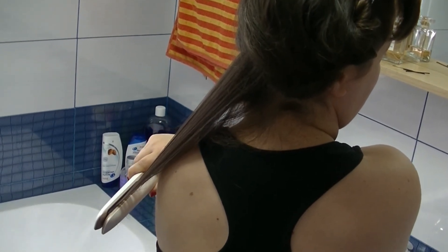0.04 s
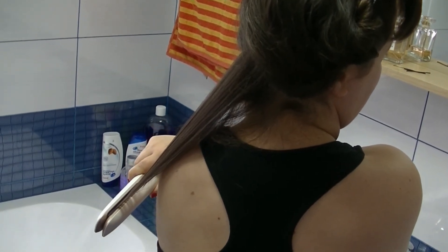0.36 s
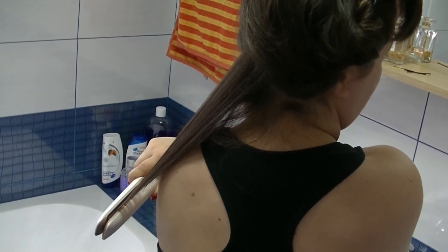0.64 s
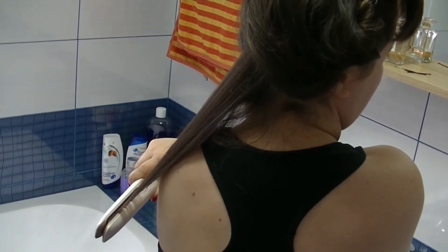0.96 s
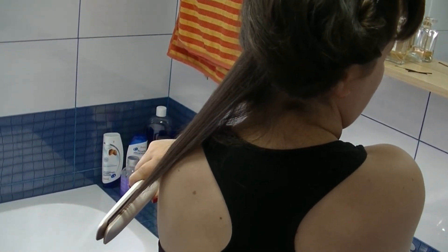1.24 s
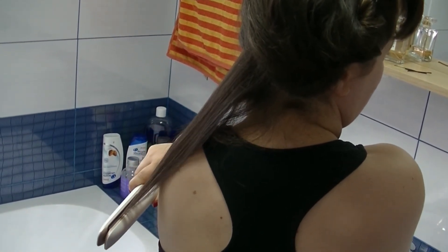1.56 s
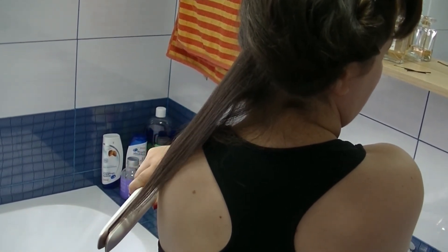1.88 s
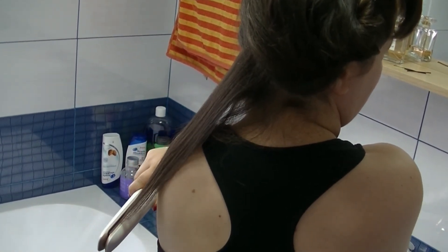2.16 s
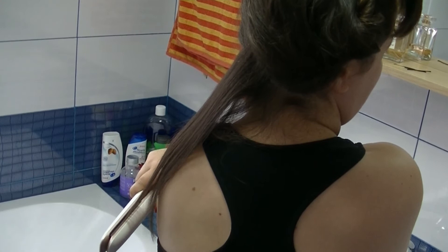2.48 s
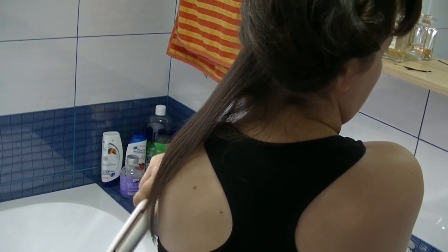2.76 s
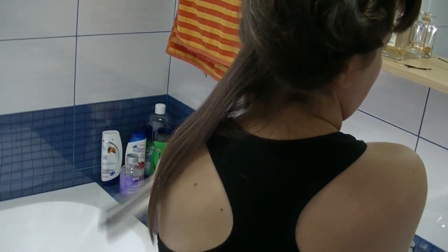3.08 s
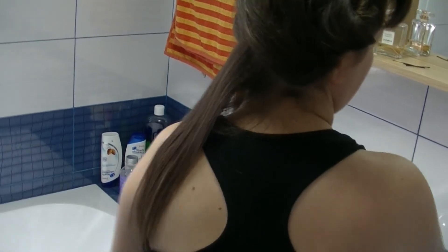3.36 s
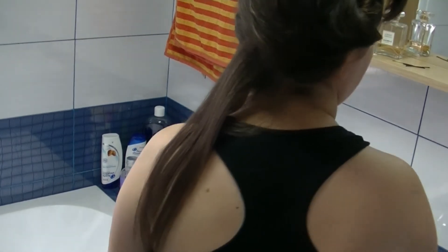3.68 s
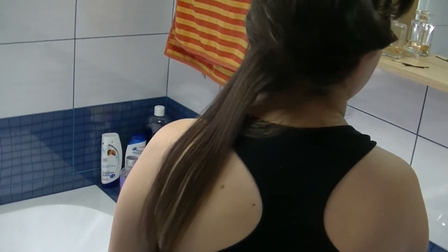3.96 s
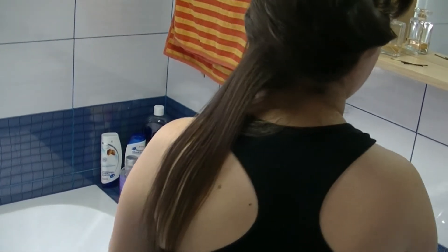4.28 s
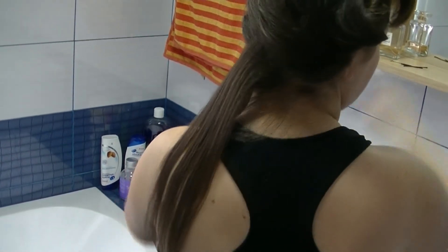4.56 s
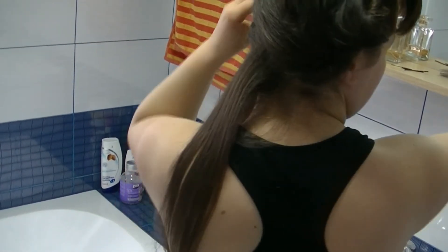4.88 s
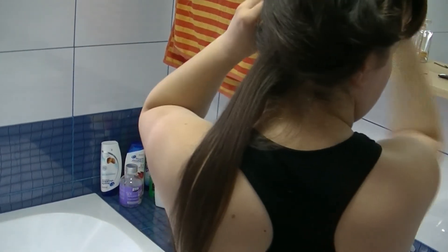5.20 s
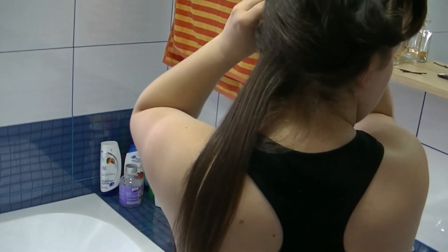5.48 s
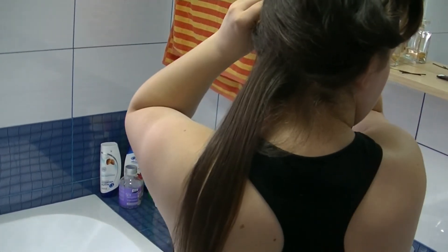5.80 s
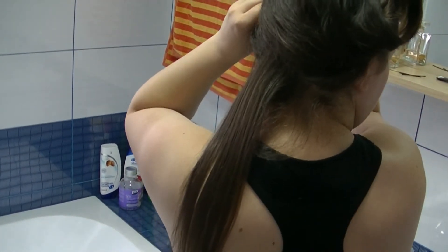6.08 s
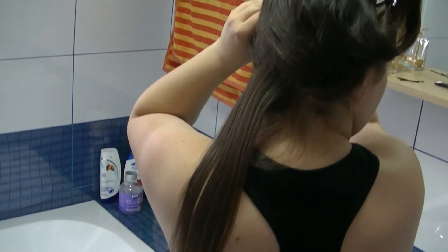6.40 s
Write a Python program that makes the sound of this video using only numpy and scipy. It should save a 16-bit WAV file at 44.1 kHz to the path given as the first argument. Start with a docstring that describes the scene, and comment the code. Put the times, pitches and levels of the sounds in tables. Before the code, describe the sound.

Faint hair strokes and clicks in a small tiled bathroom, followed by a straightener's booming knocks on the tub and a sharp plastic clack.

```python
"""A small tiled bathroom. Hair hisses in soft strokes through a straightener, whose plastic squeaks and
whose jaws click. From 3.4 s it is laid on the edge of the bath: the case cracks, the plates ring, the
hollow tub booms. Near 4.9 s a hard plastic thing, probably a comb, clacks down on the shelf; a few more
strokes and one faint click follow. The tiles ring after each knock, click and clack, and a hand-held
camera adds soft bumps, one dry tick and a bed of hiss."""
import sys
import numpy as np
from scipy import signal
from scipy.fft import rfft, irfft, next_fast_len
from scipy.io import wavfile
from scipy.ndimage import uniform_filter1d

SR = 44100
rng = np.random.default_rng(int(sys.argv[2]) if len(sys.argv) > 2 else 0)


def wav_out(sig):
    """Save sig, one row per channel (or a flat mono array), as 16-bit PCM at SR to the path in sys.argv[1]."""
    wavfile.write(sys.argv[1], SR, np.round(np.clip(np.atleast_2d(sig).T, -1, 1) * 32767).astype(np.int16))


N = 284004
AGE = np.arange(SR) / SR  # seconds since a blow

# The straightener hits the bath. Each row: start in seconds, case gain in dB, contact decay in seconds,
# treble gain in dB, mid gain in dB, weight on the tub in dB.
KNOCKS = [ (3.4174, -3, 0.013, 1, 13, -12.5), (3.5010, 4.5, 0.0012, 11, 12, -7.5),
          (3.6500, 12, 0.011, 10, 2.5, -2.5), (3.6567, 17, 0.02, -12, 8, -1),
          (3.8666, 12, .0013, -3, 1.5, 10), (3.9110, -5.5, 0.0019, 0, 19.5, 9),
          (3.9660, 2, 0.0037, -9, -4, -14), (4.008, 7, 0.0015, 2, -4.5, -12),
          (4.185, -4, 0.032, 12.5, 2, -13), (4.2240, -2.5, .0078, 7, 11, -1),
          (4.2279, 14.5, .0045, 5, -0.5, 0), (4.245, 9, 0.011, 7.5, 2, 14.5)]
# The arms drop as the hand lets go, and bounce once. Each row: start in seconds, gain in dB.
ARM_DROPS = [(4.228, -21.5), (4.245, -25)]
# The comb touches the shelf, then rattles.
# Each row: start in seconds, gain in dB, contact decay in seconds, mid gain in dB.
CLACKS = [(4.834, -4.5, 0.0043, 11), (4.8947, 17, 0.0023, -8), (4.9057, 20, 0.0011, -0.5),
          (4.9107, 18, .0013, -0.5), (4.9172, 8, 0.0059, -1)]
# Jaws and hinge click. Each row: start in seconds, gain in dB.
CLICKS = [(1.619, -27.5), (2.321, -16.5), (2.378, -25.5), (2.6878, -3), (6.119, -35)]
# Plastic rubs. Each row: start in seconds, relative level in dB, pitch in Hz, length in seconds.
SQUEAKS = [(0.655, -60, 2050, .012), (2.083, -61, 1940, 0.025), (2.192, -52.5, 5250, 0.027),
           (2.228, -64, 3450, .04), (3.27, -57, 2080, 0.012), (4.12, -42.5, 3150, 0.028)]
# Hair runs through plates and fingers.
# Each row: fastest moment in seconds, level in dB, rough length in seconds.
STROKES = [(0.35, -67, 0.62), (1.69, -64, 0.13), (2.007, -65, 0.075), (2.334, -62, 0.16), (3.06, -56, 0.24),
           (3.35, -61, 0.22), (5.428, -63.5, 0.091), (5.773, -62.5, 0.12), (6.15, -63.5, 0.28)]
# Fingers bump the camera. Each row: start in seconds, gain in dB.
BUMPS = [(0.369, -52.5), (0.77, -49.5), (2.4, -52), (3.040, -52.5), (3.323, -50), (4.981, -39),
         (5.237, -38), (6.14, -55)]

# The tone colour of each source. Each row: frequency in Hz, gain in dB.
CASE_EQ = [(60, -76), (150, -17), (280, -9), (450, -9), (650, -16), (1100, -11.5), (1600, -5), (2300, 0.5),
           (3100, -5.5), (4200, -14), (6500, -18), (8700, -23), (10200, -33.5), (16000, -38)]
PLATE_EQ = [(550, -40), (1000, -1)]  # narrow plates give off little bass
COMB_EQ = [(60, -36), (300, -24.5), (600, -20.5), (1100, -17.5), (1800, -12.5), (2400, -6.5), (3200, -9.5),
           (4500, -3), (6500, -7), (8500, -11.5), (10500, -18), (16000, -24)]
JAW_EQ = [(100, -70), (750, -22.5), (1150, -5), (1500, 0.5), (2300, -2), (3100, 0), (4400, -11.5),
          (6500, -14.5), (8500, -10.5), (11000, -19), (16000, -14)]
HAIR_EQ = [(100, -32), (900, -17.5), (1800, 0.5), (3000, -1), (5000, -2.5), (8000, -6), (16000, -27)]
SNAG_EQ = [(900, -10), (1600, -22), (2050, -8), (2450, 7), (2900, 2), (4000, -29), (12000, -20)]  # one hair ticking on the plates
CAMERA_SHELL_EQ = [(100, -38), (1400, -27), (2050, 5), (2300, -9), (2700, 7), (3500, 1), (4400, -20),
                   (16000, -47)]
HISS_EQ = [(15, -49), (25, -12.5), (156, -4), (193, -2.5), (221, -3.5), (274, 1), (523, -7.5), (666, -16.5),
           (871, -14), (1340, -16), (1570, -12.5), (2010, -9.5), (3260, -11.5), (7910, -14.5),
           (15500, -23.5)]

# How the struck parts ring. Each row: pitch in Hz, relative level in dB, seconds to fall by 60 dB.
CASE_MODES = [(500, -65, 0.59), (718, -59.5, 0.28), (825, -64, 0.55), (940, -63, 0.6), (1465, -53, 0.41),
              (1870, -65, 0.21), (1920, -55, 0.18), (2234, -52, 0.29)]  # the straightener's hollow plastic
PLATE_MODES = [(1155, -2.5, 0.11), (1197, -3.5, 0.13), (1298, -6, 0.15), (1640, -17.5, 0.22),
               (2410, -15, .23), (2444, -16, 0.45), (2573, -27, 0.53)]  # its arms and plates
BOOM_MODES = [(214, -9, 0.35), (227.2, -6, 0.63), (249.3, -5.5, 0.65), (290.2, -6.5, 0.72),
              (305.8, -6.5, 0.77), (340, -1.5, 0.47), (376, -3.5, 0.25), (451, -2, 0.73), (500, 4, 0.41)]  # the hollow bath and the room around it
THUMP_MODES = [(79.8, -9.5, 0.68), (94.8, 0, 0.58), (111.6, -11, 0.84), (125.5, -10.5, 0.92),
               (151.7, -7.5, 0.83)]  # the low end of the heavy tub
COMB_MODES = [(2230, -50, 0.2), (2450, -53, 0.18), (2687, -49.5, 0.19), (4530, -53, 0.3), (4700, -65, .22),
              (4996, -66, .2), (5870, -57, 0.39)]
SPRING_MODES = [(390, -57, 0.82), (1203, -47, .22), (1414, -49, 0.21), (1550, -41, 0.18)]  # hinge spring and jaws

# The reverb tail of the tiles. Each row: frequency in Hz, seconds to fall by 60 dB.
TILE_DECAY = [(100, 1), (300, 0.73), (700, 0.53), (1400, 0.42), (2700, 0.39), (4000, .33), (5500, 0.31),
              (8000, 0.26), (11000, 0.23), (16000, 0.15)]
# Stereo width of the room and of the hiss. Each row: frequency in Hz, side minus mid in dB.
ROOM_WIDTH = [(100, -35), (600, -14), (1200, -16.5), (2400, -7), (5000, -2.5), (9000, -3), (16000, 2)]
HISS_WIDTH = [(60, 0.5), (110, 4), (200, 3.5), (380, 0.5), (700, 3), (1290, 0.5), (2380, -0.5), (4400, 0),
              (8120, -1.5), (15000, -0.5)]


def bath_knocks(shake_db=-66, boom_db=-38.5, thump_db=-50.5, weight_share=0.52):
    """The case cracks on the rim and shakes the plates a little; the heavy tub answers last."""
    out = np.zeros((2, N))
    plates = undb(shake_db) * plate_ring()
    for start, db, contact_s, treble_db, mid_db, weight_db in KNOCKS:
        # a hard corner gives more treble than a flat side
        touch = [(200, 0.012), (750, mid_db), (1500, 0), (2400, 0),
                 (4500, treble_db), (12000, treble_db / 2)]
        crack = colour(colour(contact(contact_s), CASE_EQ), touch)
        case = bathroom(crack, direct_db=-8.5) + bloom(CASE_MODES, build_s=0.011)
        add(out, start, undb(db) * (case + plates))
        drive_db = weight_share * weight_db + (1 - weight_share) * db
        boom_hz = 275.6 * 2 ** (-weight_db / 52)  # heavier knocks boom lower
        boom = undb(boom_db + drive_db) * hollow_boom(boom_hz)
        thump = undb(thump_db + weight_db) * bloom(THUMP_MODES, build_s=0.0083)
        add(out, start, boom + thump)
    return out


def hollow_boom(centre_hz, octaves=0.28):
    """The bath booms; the place of the blow favours the resonances near one pitch."""
    favoured = [(hz, db - 3 * (np.log2(hz / centre_hz) / octaves) ** 2, t60)
                for hz, db, t60 in BOOM_MODES]
    return bloom(favoured, build_s=0.0075)


def plate_ring():
    """The narrow plates ring from the instant of the blow, thin in the bass."""
    return colour(ring(PLATE_MODES), PLATE_EQ)


def arm_drops(echo_db=-7):
    """The arms fall together and their plates ring out into the room."""
    out = np.zeros((2, N))
    plates = plate_ring()
    for start, db in ARM_DROPS:
        echo = undb(echo_db) * bathroom(plates, direct_db=-50)
        add(out, start, undb(db) * (plates + echo))
    return out


def shelf_clack(full_blow_db=19, boom_db=-44.5):
    """Hard plastic lands thinly on one end, then slaps flat in a quick rattle."""
    out = np.zeros((2, N))
    for start, db, contact_s, mid_db in CLACKS:
        force_db = db - full_blow_db  # harder blows are much brighter but hardly boom more
        touch = [(800, mid_db), (2300, 0.88), (5000, 0.4 * force_db)]
        crack = colour(colour(contact(contact_s), COMB_EQ), touch)
        clack = bathroom(crack, direct_db=-11) + bloom(COMB_MODES, build_s=0.0015)
        boom = undb(boom_db + 0.24 * force_db) * hollow_boom(centre_hz=305)
        add(out, start, undb(db) * clack + boom)
    return out


def jaw_clicks():
    """The jaws click and the hinge spring twangs."""
    out = np.zeros((2, N))
    for start, db in CLICKS:
        snap = colour(contact(0.0035, chatter=0.43), JAW_EQ)
        click = bathroom(snap, direct_db=-9) + bloom(SPRING_MODES, build_s=0.0017)
        add(out, start, undb(db) * click)
    return out


def plastic_squeaks(width=0.16):
    """Plastic rubs for a moment and sings in one narrow resonance."""
    out = np.zeros((2, N))
    for start, db, hz, length_s in SQUEAKS:
        peak = [(hz / 2, -35), (hz * (1 - width), -12), (hz, 0), (hz * (1 + width), -14), (hz * 2, -40)]
        rub = level(colour(rng.standard_normal(SR), peak), db)
        envelope = np.sin(np.pi * np.minimum(AGE / length_s, 1))
        add(out, start, bathroom(rub * envelope, direct_db=3) / 2)
    return out


def sliding_hair(flutter_db=2.5, crackle_db=-9, snags_per_s=45, spread_db=4):
    """Strands hiss unevenly as they are drawn along; single hairs snag and let go with tiny ticks."""
    flutter = level(uniform_filter1d(rng.standard_normal(N), 2000), 0)
    hiss = level(colour(stereo_noise(N, ROOM_WIDTH), HAIR_EQ), 0)
    snags = rng.random(N) < snags_per_s / SR
    snag_gain = undb(spread_db * np.minimum(rng.exponential(size=N), 3))
    crackle = level(colour(snags * snag_gain, SNAG_EQ), crackle_db)
    return (hiss + crackle) * stroke_envelope() * undb(flutter_db * flutter)


def stroke_envelope(rustle_db=-74, rise_share=0.43):
    """Each stroke swells as it speeds up, then ebbs to the faint rustle of held hair."""
    t = np.arange(N) / SR
    power = undb(rustle_db) ** 2
    for peak_s, db, length_s in STROKES:
        reach_s = length_s * np.where(t < peak_s, rise_share, 1 - rise_share)
        power = power + undb(db) ** 2 * np.exp(-((t - peak_s) / reach_s) ** 2)
    return np.sqrt(power)


def bathroom(x, direct_db, slap_db=-6, build_s=0.0019, spread_s=0.018, slaps=12):
    """Direct sound, first slaps off the near walls, then a dense tail that dulls as it dies."""
    log_hz = np.log(np.fft.rfftfreq(SR, 1 / SR) + 1)
    noise = rfft(stereo_noise(SR, ROOM_WIDTH))
    centres = np.log([hz for hz, _ in TILE_DECAY])
    response = np.zeros((2, SR))
    for share, (_, t60) in zip(np.eye(len(TILE_DECAY)), TILE_DECAY):
        band = irfft(noise * np.interp(log_hz, centres, share), SR)
        response += band * np.exp(-np.log(1000) * AGE / t60)
    response *= 1 - np.exp(-AGE / build_s)
    response /= np.linalg.norm(response.mean(axis=0))
    for late, size, angle in rng.random((slaps, 3)):
        i = int((0.000932 + late * spread_s) * SR)
        slap = undb(slap_db) * (2 * size - 1) * np.sqrt(3 / slaps)
        response[0, i] += slap
        response[1, i + int(round(4 * angle - 2))] += slap  # up to two samples early or late
    response[:, 0] += undb(direct_db)
    return signal.fftconvolve(response, x[None], axes=1)[:, :SR]


def camera_handling(peak_cycles=0.61, grip_db=-59, grip_shifts=7, tick_s=3.144, tick_db=-8):
    """Finger bumps, shifts of grip and one tick reach the microphones through the shell, free of echo."""
    out = np.zeros((2, N))
    shifts = [(start, grip_db) for start in rng.random(grip_shifts) * N / SR]
    for start, db in BUMPS + shifts:
        hz = 83 * 2 ** ((db + 51) / 33)  # firmer bumps are higher
        rise = 2 * AGE * hz / peak_cycles
        bump = undb(db) * rise * np.exp(1 - rise) * np.sin(2 * np.pi * hz * AGE)
        add(out, start, colour(bump, [(25, -14), (70, 1)]))
    add(out, tick_s, undb(tick_db) * colour(contact(0.0038, chatter=0.98), CAMERA_SHELL_EQ))
    return out


def camera_hiss(db=-56.5):
    """A steady, wide bed of noise, fullest in the low end."""
    return level(colour(stereo_noise(N, HISS_WIDTH), HISS_EQ), db)


def contact(decay_s, chatter=0.9):
    """A hard first touch and a brief chatter of the surfaces, even in spectrum; unit energy."""
    fade = np.exp(-AGE / decay_s)
    x = rng.standard_normal(SR) * fade
    x *= chatter / np.linalg.norm(x)
    x[0] = 1 - min(chatter, 0.95)
    for _ in range(3):  # flatten the spectrum, then tighten the tail
        flat = irfft(np.exp(1j * np.angle(rfft(x))), SR)
        x = flat * np.sqrt(fade)
    return x / np.linalg.norm(x)


def ring(modes, phase_cycles=0):
    """A struck part rings as a sum of decaying sines."""
    hz, db, t60 = np.transpose(modes)[:, :, None]
    tones = undb(db) * np.sin(2 * np.pi * (hz * AGE + phase_cycles))
    return np.sum(tones * np.exp(-np.log(1000) * AGE / t60), axis=0)


def bloom(modes, build_s):
    """Resonances build up after the blow, each with a phase of its own."""
    attack = (1 - np.exp(-AGE / build_s)) ** 2
    return attack * ring(modes, rng.random((len(modes), 1)))


def stereo_noise(size, width):
    """White noise in the middle, with side noise shaped by the width curve."""
    mid, side = rng.standard_normal((2, size))
    side = colour(side, width)
    return np.array([mid + side, mid - side])


def colour(x, curve):
    """Minimum-phase EQ through (Hz, dB) points, so nothing rings ahead of an attack."""
    n = 2 * next_fast_len(x.shape[-1])
    hz, db = np.transpose(curve)
    log_hz = np.log(np.maximum(np.fft.rfftfreq(n, 1 / SR), 1))
    cepstrum = irfft(np.interp(log_hz, np.log(hz), db) * np.log(10) / 20)
    cepstrum[1:n // 2] *= 2
    cepstrum[n // 2 + 1:] = 0
    return irfft(rfft(x, n) * np.exp(rfft(cepstrum)))[..., :x.shape[-1]]


def undb(db):
    """Decibels to gain."""
    return 10 ** (np.asarray(db) / 20)


def level(x, db):
    """Set the rms level."""
    return x * undb(db) / np.sqrt(np.mean(x ** 2))


def add(out, start_s, sound):
    """Drop a sound into the mix."""
    i = int(start_s * SR)
    out[:, i:i + sound.shape[-1]] += sound[..., :N - i]


def scene(right_lead_db=1.16):
    """Blows and squeaks sit slightly to the right; hair and camera stay centred."""
    props = jaw_clicks() + bath_knocks() + arm_drops() + shelf_clack() + plastic_squeaks()
    pan = undb([[-right_lead_db / 2], [right_lead_db / 2]])
    return props * pan + sliding_hair() + camera_hiss() + camera_handling()


def record(dry):
    """A steep low-pass takes off the air above 15.9 kHz."""
    return signal.sosfilt(signal.ellip(10, 0.2, 80, 15900, fs=SR, output="sos"), dry)


dry = scene()
out = record(dry)
wav_out(out)
```